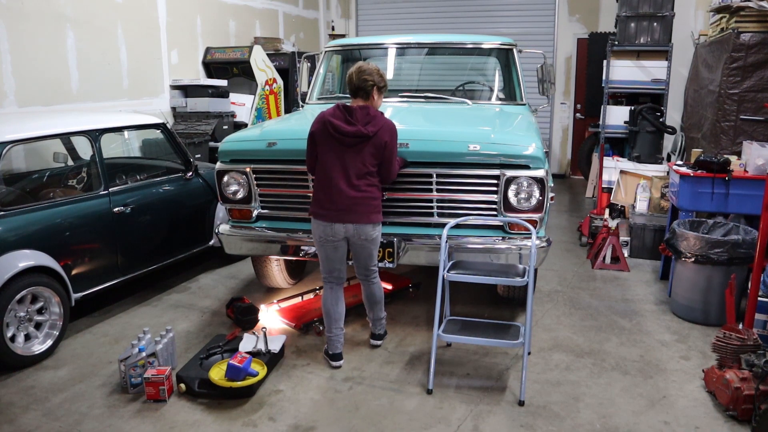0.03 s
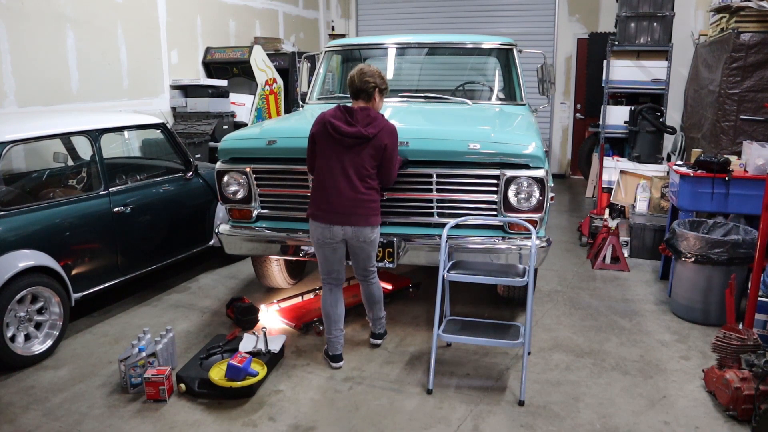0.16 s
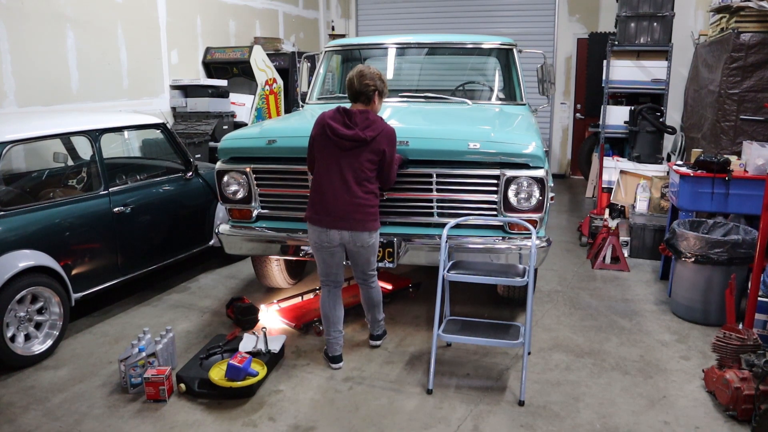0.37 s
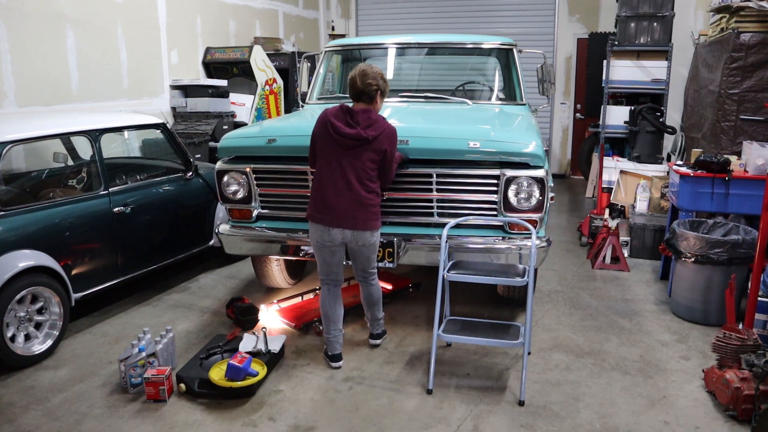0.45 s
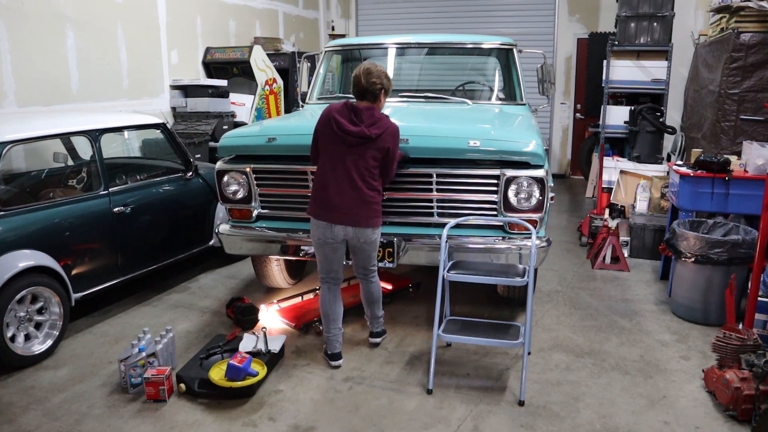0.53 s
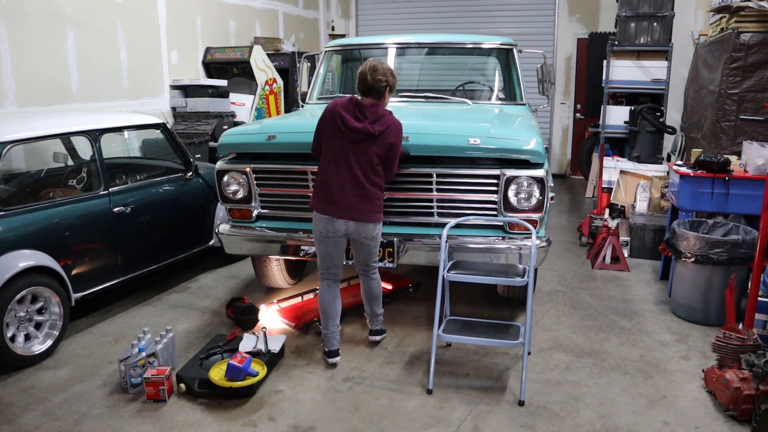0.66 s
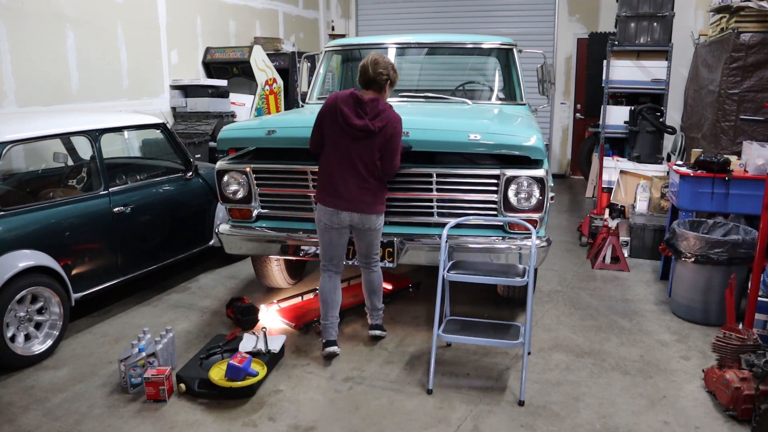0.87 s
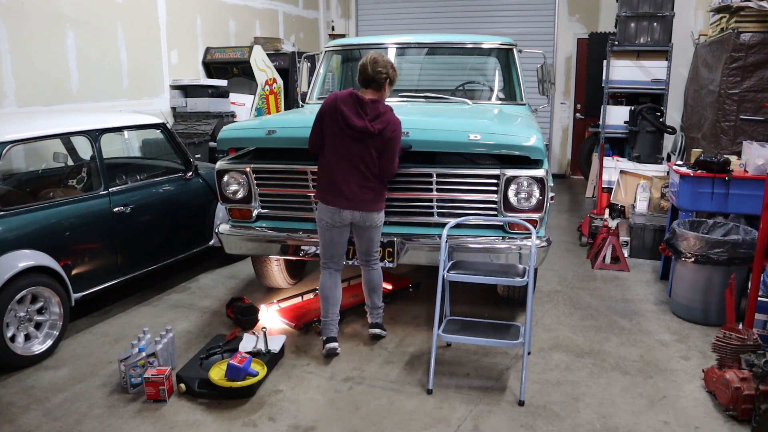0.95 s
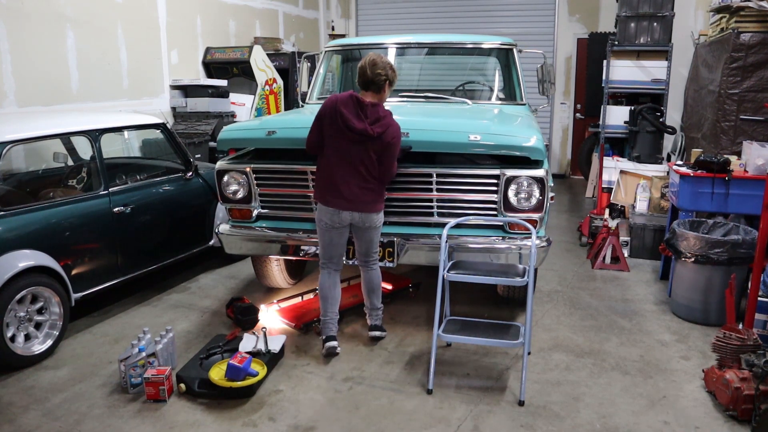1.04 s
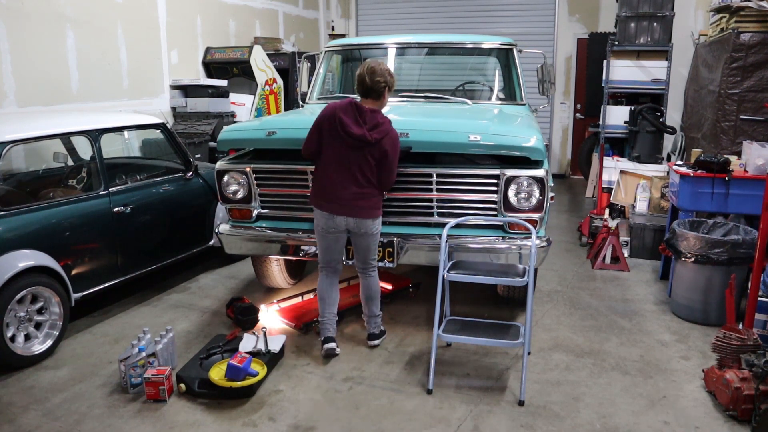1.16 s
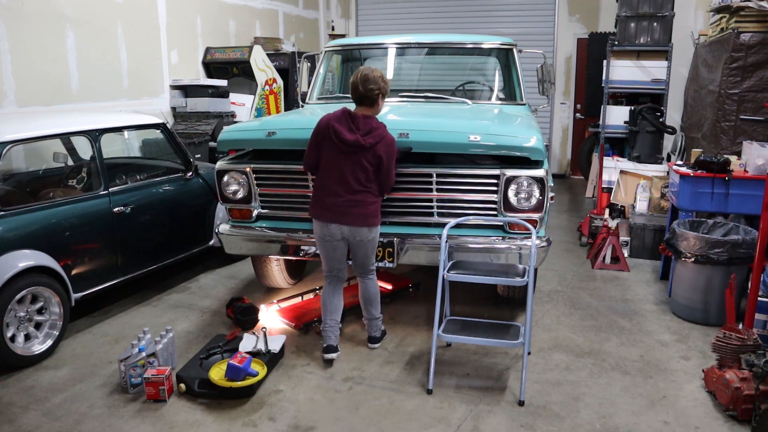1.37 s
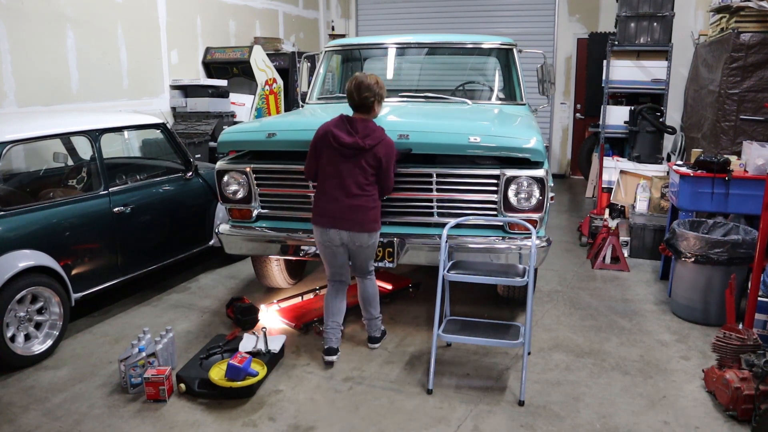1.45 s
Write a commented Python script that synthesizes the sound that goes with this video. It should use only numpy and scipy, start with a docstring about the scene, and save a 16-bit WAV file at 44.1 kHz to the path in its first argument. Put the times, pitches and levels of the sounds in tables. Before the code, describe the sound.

A steel truck hood springs up with a loud, ringing clunk and a quick rebound. After a short pause come more clanks and a light, squeaky rattle. Hands rub faintly on the panel, heard from across a hard-walled garage.

```python
"""A garage, where an old pickup's hood is unlatched a few metres away.
The latch snaps and the sprung sheet-steel hood jumps up, booms and rebounds. Lifted, it knocks and
judders against the safety catch, which then scrapes free, squeaks and jingles. Hands and clothes
rumble on the panel. Hard walls widen and prolong every blow over a quiet room tone."""
import sys
import numpy as np
from scipy import signal
from scipy.fft import rfft, irfft, next_fast_len
from scipy.io import wavfile

SR = 44100
rng = np.random.default_rng(int(sys.argv[2]) if len(sys.argv) > 2 else 0)


def wav_record(signal):
    """Record a signal, one row per channel, as 16-bit PCM in the file named by sys.argv[1]."""
    frames = np.transpose(np.atleast_2d(signal))
    bounded = np.clip(frames, -1, 1)
    # unit amplitude maps onto the largest positive 16-bit level
    quanta = np.round(bounded * 32767).astype(np.int16)
    wavfile.write(sys.argv[1], SR, quanta)


N = 66150

# The hood's clear panel modes. Each row: pitch in Hz, relative level in dB, t60 in seconds.
PANEL_MODES = [(105.4, 2.5, 0.22), (133.8, -10, 1), (210, -6, 0.82), (232.4, -8.5, 0.75), (265.2, -2.5, 1),
               (336, -7, 0.15), (380.5, -5.5, 0.73), (455, -1.5, 0.47), (484.6, -1.5, 0.25), (561, -6, 0.6),
               (666.6, -4, 0.29), (782.5, -9, 0.68), (811, 5, 0.28)]
# Stereo width. Each row: frequency in Hz, side gain in dB for first reflections, then for diffuse sound.
STEREO_WIDTH = [(60, -45, -40), (130, -28, -22), (250, -22, -13), (500, -14, -7), (1000, -9, -3),
                (2000, -3, 2.5), (4000, 0, 4.5), (8000, 3, 6), (14000, 3.5, 6)]


def hood_jump():
    """The sprung hood jumps up, rebounds and is nudged by the hands; its sheet steel rings each time."""
    # Each row: start in seconds, relative level in dB, tilt in dB per octave, rise in seconds,
    # ring length factor, relative level of the panel modes in dB.
    blows = [(.2045, -3, -2.5, .003, 0.68, -25.5), (.217, -1, 2, 0.001, 0.91, -29.5),
             (.272, -7.5, -1, 0.0031, 1.07, -31.5), (.33, -10, -0.6, 0.01, 0.9, -34.5),
             (.368, -14.5, 2.7, 0.0033, 0.53, -40), (.445, -29.5, -6.5, 0.0056, 0.97, -45),
             (.648, -39, -1, 0.013, 1.3, -45.5), (.822, -50.5, -8, 0.0068, 0.74, -61)]
    # The panel's dense ring. Each row: frequency in Hz, spectral level in dB, t60 in seconds.
    body = [(25.3, -22, .2), (54.7, 0, .22), (104, 3.5, 0.39), (250, 6, 0.31), (510, 3.5, 0.31),
            (960, 1, 0.23), (2080, -3.5, 0.14), (4100, -10.5, 0.1), (7900, -23.5, 0.042),
            (14000, -54, 0.09)]
    return strikes(blows, body, PANEL_MODES, chatter_db=1.0)


def hood_knocks():
    """The lifted hood knocks against the safety catch, ringing its hollow front edge."""
    # Each row: start in seconds, relative level in dB, tilt in dB per octave, rise in seconds,
    # ring length factor, relative level of the panel modes in dB.
    knocks = [(.942, -10.5, 0.2, 0.01, 2, -35.5), (1.002, -7.5, 0.8, 0.0023, 1.3, -36.5),
              (1.011, -3, 2.54, 0.0037, 0.95, -33.5), (1.032, -8, -2.7, .008, 0.65, -36)]
    # The edge's dense ring. Each row: frequency in Hz, spectral level in dB, t60 in seconds.
    body = [(25, -14, .2), (55, -6, 0.45), (124, 4, 0.23), (210, -3, 0.23), (340, -9.5, 0.48),
            (440, 5.5, 0.2), (690, 1.5, 0.29), (1170, 3.5, .17), (1450, -3, 0.14), (2000, -4, 0.22),
            (4030, -23.5, 0.29), (8000, -30.5, 0.15), (14000, -55, 0.089)]
    return strikes(knocks, body, PANEL_MODES, chatter_db=1.1)


def latch_hits():
    """Steel hits steel at the latch: bright snaps that set the safety catch jingling."""
    # Each row: start in seconds, relative level in dB, tilt in dB per octave, rise in seconds,
    # ring length factor, relative level of the catch modes in dB.
    hits = [(.2058, -1.5, -1, 0.00016, 0.73, -38), (.2085, 1.5, -0.6, 0.00084, 0.4, -49),
            (.338, -11.5, -4.4, 0.013, 2.86, -46), (.702, -52, 0, .004, 1.3, -67),
            (.735, -37, -3, 0.0081, 1.2, -68.5), (.828, -40.5, -.5, 0.0022, 0.91, -57),
            (.9415, -14.5, 1, 0.0044, 1.7, -44), (1.0025, -13, 3.5, 0.009, 0.96, -33),
            (1.131, -6, -0.28, 0.0027, 2.3, -22.5), (1.153, -7.5, 1.27, 0.0042, 2.02, -29),
            (1.232, -18.5, -12, 0.0021, 0.79, -54), (1.275, -24, 0, 0.0042, 3.5, -33.5),
            (1.327, -22.5, 1.2, 0.0072, 2.0, -35), (1.352, -22, -1, .004, 0.98, -42),
            (1.392, -37, 3.5, 0.0039, 1.7, -48)]
    # The latch's dense ring. Each row: frequency in Hz, spectral level in dB, t60 in seconds.
    body = [(25, -43, 0.053), (201, -14.5, 0.04), (650, -1.5, 0.16), (1200, 2.5, 0.066), (2240, 3.5, 0.095),
            (2960, -1.5, 0.099), (5420, 1, 0.058), (7780, -7, 0.1), (12200, -9.5, 0.085),
            (15000, -32, 0.032)]
    # The jingle. Each row: pitch in Hz, relative level in dB, t60 in seconds.
    catch_modes = [(1083, -4, .3), (1118, 0, 0.17), (1253, -2.5, 0.38), (1508, -8, 0.38), (1670, 1, 0.15),
                   (1950, -7.5, 0.43), (1930, -7, .3), (2327, -9, 0.45), (2407, -5.5, 0.33),
                   (3260, -10, 0.15), (3510, -6, 0.11), (5710, -2.5, 0.045)]
    return strikes(hits, body, catch_modes, chatter_db=2.5)


def strikes(events, body, modes, chatter_db):
    """Each blow swells over its contact time and rings the dense body and the clear modes."""
    out, t = np.zeros(N), np.arange(N) / SR
    for start, db, tilt_db, rise, length, modes_db in events:
        swell = 1 - np.exp(-2 * t / rise)
        ring = dense_ring(body, tilt_db, length)
        chatter = chatter_db * walk(1400, len(ring))  # uneven steel contact
        add(out, start, amp(db + chatter) * ring * swell[:len(ring)])
        detune = 1 + .006 * rng.standard_normal(len(modes))
        clear = sum(mode(hz * d, level, t60) for (hz, level, t60), d in zip(modes, detune))
        add(out, start, amp(modes_db) * clear * swell)
    return out


def dense_ring(table, tilt_db=0, length=1, size=24000):
    """Countless modes as half-octave bands of noise, each dying at its own rate."""
    t, hz = np.arange(size) / SR, np.fft.rfftfreq(size, 1 / SR) + 1
    octave = np.log2(hz / 1000)
    spectrum = rfft(rng.standard_normal(size)) * amp(over_hz(table, hz) + tilt_db * octave)
    out = np.zeros(size)
    for centre in np.arange(-5.5, 4.6, .5):
        t60 = length * over_hz(table, 1000 * 2 ** centre, column=2)
        band = np.maximum(1 - 2 * abs(octave - centre), 0)
        out += irfft(spectrum * band, size) * decay(t, t60)
    return out


def hood_boom():
    """The whole hood flexes; two deep bending modes beat against each other, so the boom throbs."""
    # Each row: start in seconds, relative level in dB.
    flexes = [(0.2023, -21), (0.32, -32), (1.011, -26), (1.106, -30.5)]
    # Each row: pitch in Hz, relative level in dB, t60 in seconds.
    bending_modes = [(52.5, 2, 0.61), (69, -2.5, 0.59)]
    boom = sum(mode(hz, db, t60) for hz, db, t60 in bending_modes)
    out = np.zeros(N)
    for start, db in flexes:
        add(out, start, amp(db) * boom)
    return out


def judder():
    """The strained hood shudders on the catch until that lets go."""
    # The shudder's envelope. Each row: time in seconds, relative level in dB.
    envelope = [(.99, -64), (1.02, -23.5), (1.075, -22.5), (1.105, -24.5), (1.135, -40), (1.16, -70)]
    # Its buzz. Each row: harmonic number, relative level in dB.
    partials = [(1, 5), (2, -0.5), (3, -22), (4, -7)]
    phase = wavering_phase(hz=139.6, wobble=.021, rate=59)
    buzz = sum(amp(db) * np.sin(k * phase) for k, db in partials)
    t = np.arange(N) / SR
    pulling = (t > envelope[0][0]) & (t < envelope[-1][0])
    return buzz * curve(envelope) * pulling


def squeaks():
    """Steel slips on steel at the catch and hinges and sings for an instant."""
    # Each row: start in seconds, length in seconds, pitch in Hz, level in dB.
    slips = [(1.128, 0.028, 1124, -18), (1.146, 0.031, 1708, -15.5), (1.282, 0.024, 1467, -29.5),
             (1.323, 0.016, 1083, -28.5), (1.342, .02, 1962, -33), (1.348, 0.034, 1707, -33),
             (1.385, 0.019, 1073, -32.5)]
    out = np.zeros(N)
    for start, length, hz, db in slips:
        size = int(length * SR)
        phase = wavering_phase(hz, wobble=.02, rate=440)[:size]
        add(out, start, amp(db) * np.sin(phase) * np.hanning(size))
    return out


def garage_echo(x):
    """First reflections off floor and truck, and the walls' long echo, as mid and side."""
    # Each row: frequency in Hz, echo level against the direct sound in dB, t60 in seconds.
    echo = [(45, 6, 0.41), (85, -9, 0.67), (149, -5.5, 1), (395, -5, 0.56), (1010, -2.5, 0.55),
            (2340, -3.5, 0.68), (5040, -6, 0.89), (9100, -4.5, 0.46), (14000, -5.5, 0.45)]
    build_s, early_delay_s, early_t60_s = .0051, .002, .028
    t = np.arange(N) / SR
    build = 1 - np.exp(-t / build_s)
    # Spread each band's energy over the length of its tail.
    tail = [(hz, db + 10 * np.log10(2 * np.log(1000) / (t60 * SR)), t60) for hz, db, t60 in echo]
    mid, side = (dense_ring(tail, size=N) * build for _ in range(2))
    early = rng.standard_normal(N) * decay(t, early_t60_s) * (t > early_delay_s)
    early /= np.linalg.norm(early)
    side = colour(side, STEREO_WIDTH, column=2) + colour(early, STEREO_WIDTH)
    return np.array([signal.fftconvolve(x, mid)[:N], signal.fftconvolve(x, side)[:N]])


def handling():
    """Hands and clothes rub on the hood and make it rumble."""
    # Each row: time in seconds, relative level in dB.
    rubbing = [(0, -23.5), (.08, -30), (.19, -31), (.5, -34), (.68, -25.5), (.8, -31), (.92, -30),
               (1.2, -22), (1.5, -32.5)]
    # Each row: frequency in Hz, spectral level in dB.
    rumble = [(25, -14), (60, 10), (95, -11), (130, 7), (190, -10), (270, -0.5), (380, -0.5), (600, -6.5),
              (1500, -13), (4000, -22.5), (12000, -47.5)]
    return curve(rubbing) * diffuse(rumble)


def room_tone():
    """The garage's steady, bass-heavy hush, at unit RMS in the mid."""
    # Each row: frequency in Hz, relative spectral level in dB.
    hush = [(15, -66), (25, -37), (113, -3), (286, -18), (335, -12), (916, -29), (1360, -41), (2860, -38.5),
            (11600, -49.5), (14000, -63)]
    tone = diffuse(hush)
    return tone / tone[0].std()


def diffuse(table):
    """Steady noise arriving from all sides, as mid and side."""
    mid, side = (colour(rng.standard_normal(N), table) for _ in range(2))
    return np.array([mid, colour(side, STEREO_WIDTH, column=2)])


def amp(db):
    """Gain from decibels."""
    return 10 ** (np.asarray(db) / 20)


def decay(t, t60):
    """A fade that loses 60 dB in t60 seconds."""
    return np.exp(-np.log(1000) * t / t60)


def mode(hz, db, t60):
    """One resonance ringing out as a dying sine."""
    t = np.arange(N) / SR
    return amp(db) * np.sin(2 * np.pi * hz * t) * decay(t, t60)


def walk(rate, size):
    """A random wander with a spread near 1, turning rate times a second."""
    return np.interp(np.arange(size) * rate / SR, np.arange(size), rng.standard_normal(size))


def wavering_phase(hz, wobble, rate):
    """Phase of a tone whose pitch wanders by about the fraction wobble."""
    return 2 * np.pi * np.cumsum(hz * (1 + wobble * walk(rate, N))) / SR


def over_hz(table, hz, column=1):
    """One column of a table, read along log frequency."""
    rows = np.array(table, float)
    return np.interp(np.log(np.maximum(hz, 1)), np.log(rows[:, 0]), rows[:, column])


def colour(x, table, column=1):
    """Equalise by a table of Hz and dB."""
    size = next_fast_len(2 * len(x))
    gain = amp(over_hz(table, np.fft.rfftfreq(size, 1 / SR), column))
    return irfft(rfft(x, size) * gain, size)[:len(x)]


def curve(points):
    """A gain envelope through points of seconds and dB."""
    return amp(np.interp(np.arange(N) / SR, *np.array(points).T))


def add(track, start_s, x):
    """Mix x into the track at a time."""
    i = int(start_s * SR)
    track[i:i + len(x)] += x[:N - i]


def scene():
    """Hood, latch and catch in the garage, over handling and room tone, as left and right."""
    friction_send_db, tone_db, left_db = -16.5, -43.5, -.5
    metal = amp(1.0) * hood_jump() + amp(.5) * hood_knocks() + amp(-3.5) * latch_hits()
    friction = judder() + squeaks()  # these stir the room less than the blows
    background = amp(tone_db) * room_tone() + handling()
    mid, side = garage_echo(metal + amp(friction_send_db) * friction) + background
    mid = mid + metal + friction + hood_boom()
    return np.array([amp(left_db) * (mid + side), mid - side])


def record(dry):
    """Drop the deepest bass, round the loudest peaks and cut the top."""
    low_cut_hz, top_hz, ceiling = 37.6, 15500, 1.15
    low_cut = signal.butter(3, low_cut_hz, "high", fs=SR, output="sos")
    top_cut = signal.ellip(12, .2, 90, top_hz, fs=SR, output="sos")
    rounded = ceiling * np.tanh(signal.sosfilt(low_cut, dry) / ceiling)
    return signal.sosfilt(top_cut, rounded)


dry = scene()
out = record(dry)
wav_record(out)
```